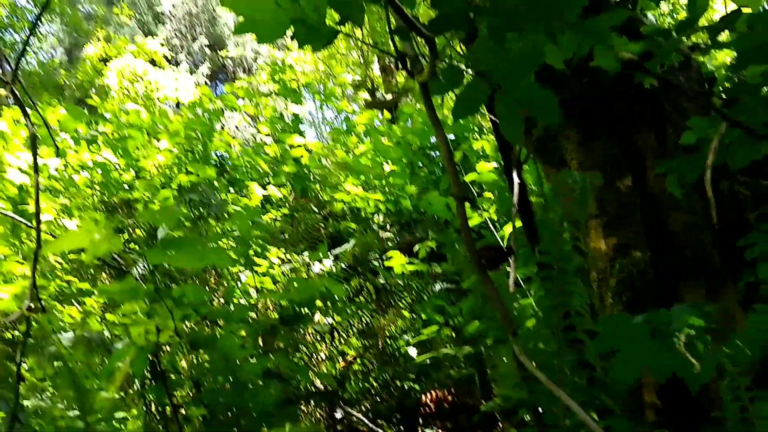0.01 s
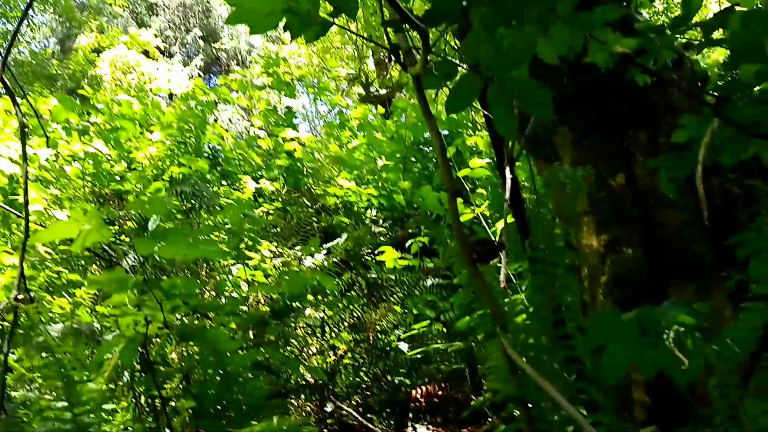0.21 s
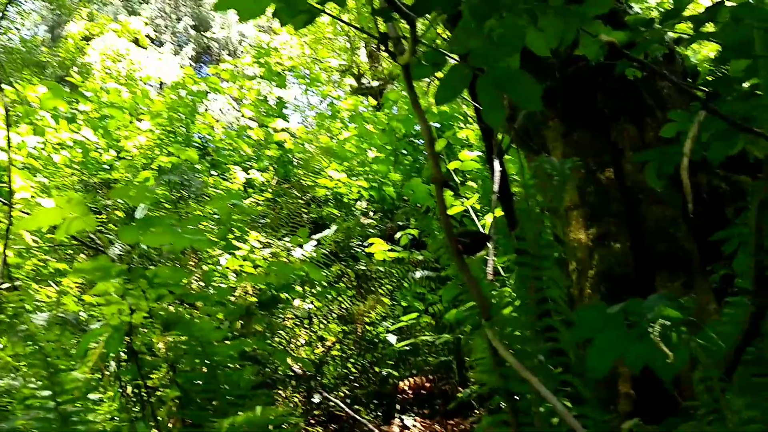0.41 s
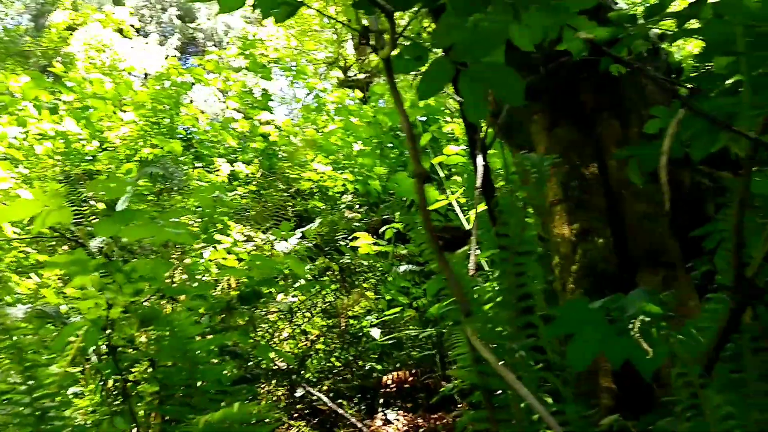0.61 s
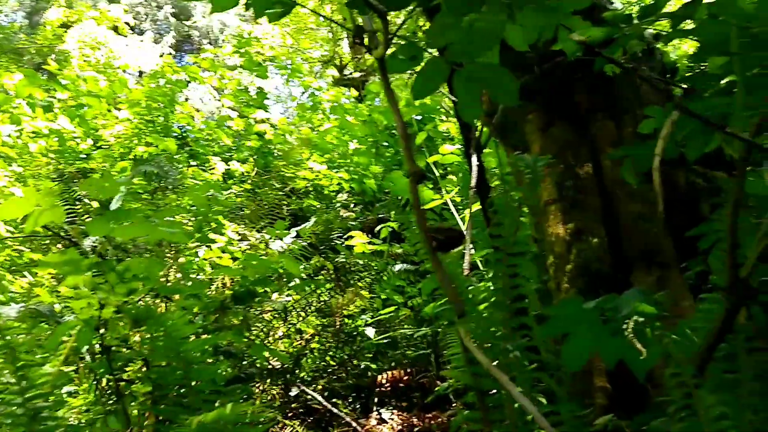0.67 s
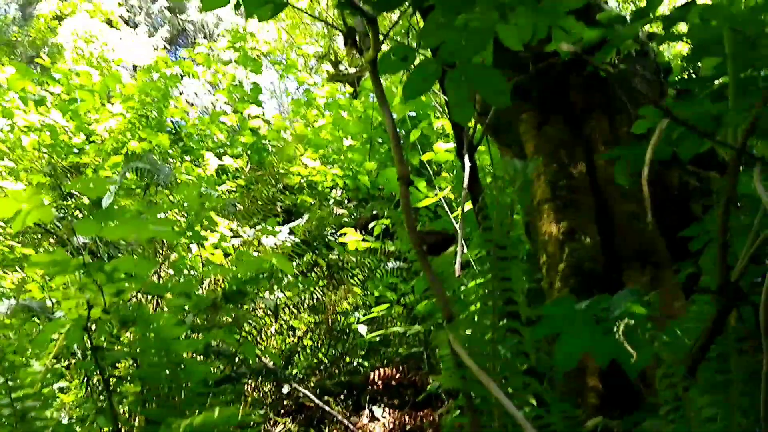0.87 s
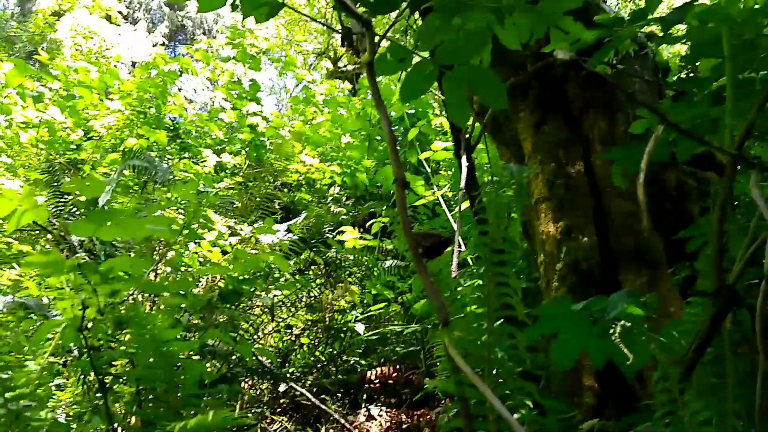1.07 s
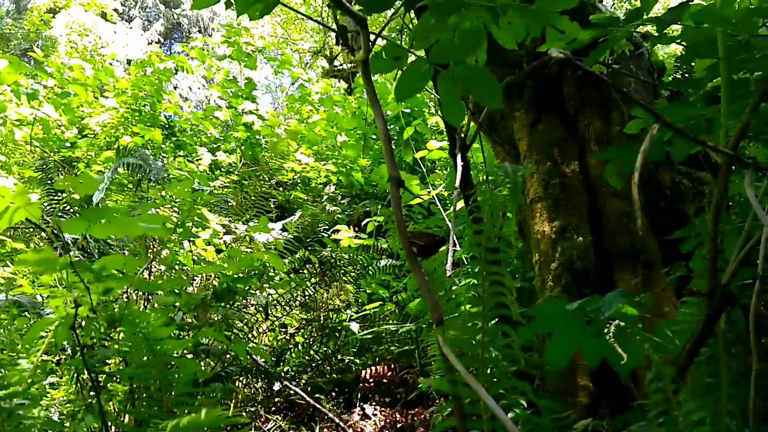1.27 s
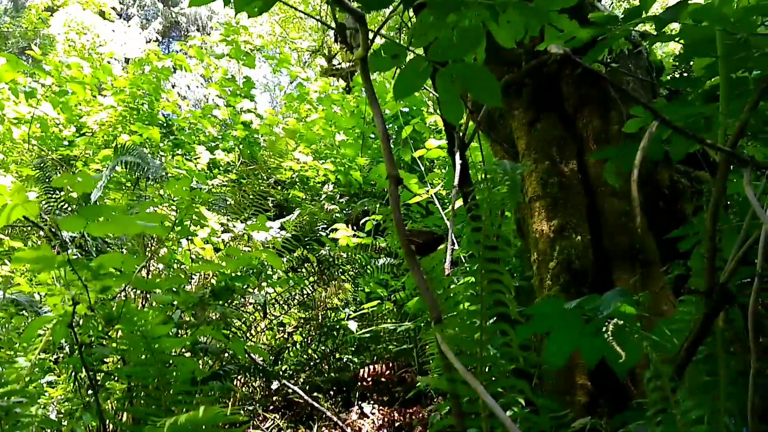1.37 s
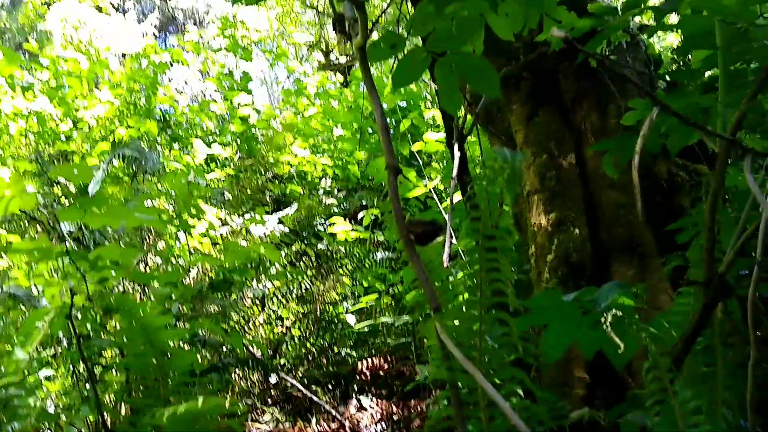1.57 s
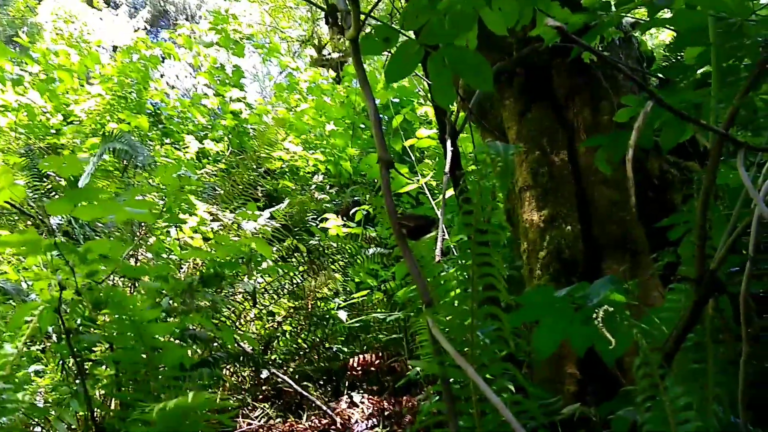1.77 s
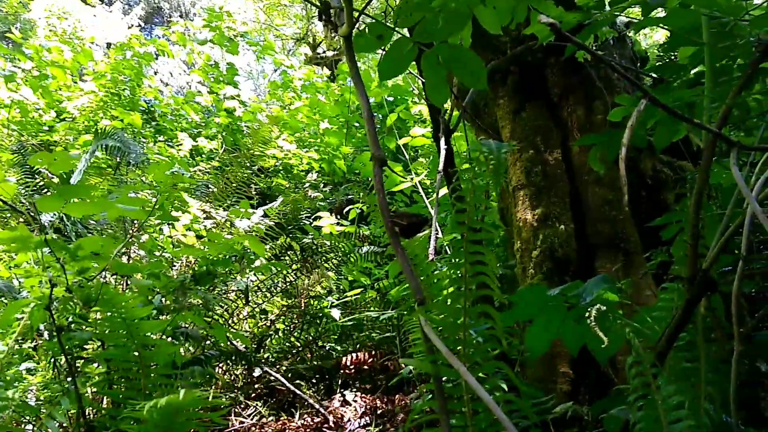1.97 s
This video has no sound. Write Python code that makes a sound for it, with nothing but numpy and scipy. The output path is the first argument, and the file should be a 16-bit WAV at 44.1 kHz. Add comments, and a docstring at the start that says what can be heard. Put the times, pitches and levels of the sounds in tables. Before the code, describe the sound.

In a leafy forest, a faint far twitter gives way to one rapid, high-pitched trill from a small bird near the microphone's left. Afterwards a soft hiss remains, with a thin distant peep and slight twig ticks.

```python
"""In a leafy forest, a small bird close by on the left rattles off a trill of sharp chips.
Each chip is a short note and a steeply falling whistle; leaves scatter it. A brief halo of broad,
bright noise is heard around each chip. A far twitter fades as the trill starts, a far bird peeps twice,
and twigs tick in bursts of noise. A broad hiss with a low flutter lies underneath, mostly at the right
microphone port (its opening)."""
import sys
import numpy as np
from scipy import signal
from scipy.fft import rfft, irfft
from scipy.io import wavfile

SR = 44100
rng = np.random.default_rng(int(sys.argv[2]) if len(sys.argv) > 2 else 0)


def to_wav(s):
    """Save 16-bit WAV."""
    ch = np.atleast_2d(s).T  # columns
    pcm = np.round(np.clip(ch, -1, 1) * 32767)  # PCM
    wavfile.write(sys.argv[1], SR, pcm.astype(np.int16))


N = 88200

# tone colour of the hiss (frequency [Hz], relative level [dB])
HISS_COLOUR = [(15, -30), (25, -20), (43, 1), (119, -3.5), (234, 3.5), (268, 0.5), (401, -9), (600, -20),
               (780, -7.5), (860, -4), (1020, -7.5), (1210, -0.5), (1540, 0.5), (2080, 3), (2870, 0),
               (3200, -4), (3650, -7), (4300, -6.5), (5300, -13), (7370, -4.5), (8900, -7.5), (9650, -30.5),
               (13300, -16.5), (15700, -67)]
# which side the hiss leans to (frequency [Hz], left minus right [dB])
HISS_BALANCE = [(40, -2.5), (140, 1), (250, -6.5), (500, -4.5), (770, -14.5), (1200, -23), (2000, -27),
                (2900, -18.5), (4200, -21.5), (6400, -33), (9000, -25), (11000, -4), (15000, -21)]
# how alike its two sides are (frequency [Hz], likeness [0 to 1])
HISS_LIKENESS = [(30, 1), (90, 0.81), (200, 0.95), (500, 0.44), (1100, 0.86), (2000, 0.057)]
# how much it flickers (frequency [Hz], typical swing [dB])
HISS_FLICKER = [(60, 2), (250, 3), (700, 4), (1300, 1.5), (2500, 1.2), (4000, 2.2), (6000, 1.5)]
# loudness of its middle band (time [s], level [dB])
HISS_LOUDNESS = [(0.0, -58.5), (0.15, -57), (0.48, -54), (0.75, -55), (1.02, -57), (1.6, -59), (2.0, -58)]
# rise and fall of the low flutter (time [s], relative level [dB])
FLUTTER_SWELL = [(0.0, -85), (0.04, -59), (0.31, -66), (0.51, -69), (0.73, -65), (1.07, -72), (1.09, -70),
                 (1.2, -64), (1.36, -79), (1.47, -66.5), (1.51, -76.5), (1.57, -69.5), (1.73, -75.5),
                 (1.75, -67.5), (1.98, -69.5), (2.0, -67)]
# rise and fall of the murmur just above it (time [s], relative level [dB])
MURMUR_SWELL = [(0.0, -85), (0.04, -63), (0.28, -79.5), (0.3, -69), (0.33, -89), (0.34, -68.5), (0.55, -66),
                (0.68, -74), (0.86, -78), (0.9, -65), (1.05, -75.5), (1.48, -68.5), (1.92, -78.5),
                (2.0, -73)]
# rise and fall of a thin, high band in the hiss (time [s], relative level [dB])
THIN_SWELL = [(0.0, -78), (0.14, -77), (0.27, -71), (0.4, -61.5), (0.49, -58.5), (0.66, -61), (0.81, -67.5),
              (1.16, -70.5), (2.0, -72)]
# far twitter, before it is set to the right (time [s], level [dB])
TWITTER_LOUDNESS = [(0.0, -56.5), (0.06, -53), (0.13, -53), (0.145, -50)]
# twig ticks (time [s], left [dB], right [dB], fade [ms], dull brushing on the right [dB])
TWIG_TICKS = [(0.035, -77, -55, 2.5, -58), (0.047, -87, -47.5, 2.7, -52.5), (1.111, -50, -52.5, 6, -87),
              (1.525, -48, -48.5, 4, -89)]
# tail of a tick, left row then right (relative level [dB], fade [ms])
TICK_LEAF_TAILS = [(-9, 70), (-.5, 55)]
# bright colour of a tick (frequency [Hz], relative level [dB])
TICK_COLOUR = [(1000, -43), (5200, -3), (6500, 13), (10000, 7.5), (15000, 3)]
# dull colour of the brushing (frequency [Hz], relative level [dB])
BRUSH_COLOUR = [(150, -22), (450, 3), (1500, 2), (4000, -7.5), (8000, -36)]
# far peeps, before they are set to the left (time [s], pitch [Hz], level [dB], fade [ms])
FAR_PEEPS = [(0.139, 9060, -48.5, 32), (0.928, 9030, -48.5, 36)]
# echoes from near leaves, left row then right (level [dB], time to fade by 60 dB [s])
LEAF_ECHOES = [(-4.5, 0.13), (3, 0.23)]
# colour of the leaf echoes (frequency [Hz], gain [dB])
LEAF_COLOUR = [(4000, 2), (6500, -3.9), (7500, 0), (8600, -1), (10800, -3), (13000, 2), (15000, -4)]
# echoes from far trees, left row then right (level [dB], time to fade by 60 dB [s])
TREE_ECHOES = [(-18.5, .5), (-12, .45)]
# colour of the tree echoes (frequency [Hz], gain [dB])
TREE_COLOUR = [(3000, 0), (6300, 0), (7500, -6), (9000, -1), (10000, -3), (13000, -1), (15000, -9)]
# the trill (time [s], whistle level [dB], whistle hold [ms], note level [dB], note's head start [ms])
TRILL_CHIPS = [(0.2181, -31, .3, -31, 4), (.2428, -23, 0.37, -32, 2.8), (0.2607, -14.5, 1.6, -38.5, 5),
               (0.2967, -14, 2.8, -22, 3.9), (.3346, -14.5, 4.3, -21.5, 5), (0.3738, -14, 3.4, -22.5, 5.5),
               (0.4153, -16, 4.1, -21, 5.4), (0.4592, -15, 5.7, -22.5, 5.2), (.5042, -13.5, 3.6, -22, 6.6),
               (0.5489, -14.5, 2.5, -21, 4.8), (0.6011, -14, 4, -20.5, 4.5), (0.6491, -14, 2.8, -21, 4.8),
               (.7013, -15.5, 5.4, -21, 4.8), (.7520, -13.5, 1.9, -23, 4.7), (0.8061, -15, 2.1, -23, 3.25)]
# colour of the halo of bright noise around each chip (frequency [Hz], relative level [dB])
HALO_COLOUR = [(2000, -38), (3600, -16.5), (4400, -12), (5300, -6), (6400, 3.5), (8500, 3.5), (12000, -2),
               (14000, -2), (15100, -17)]
# echoes off tree trunks (delay [ms], gain [dB])
TRUNK_BOUNCES = [(6.5, -15), (12.5, -20)]
# how the right port dulls the near bird (frequency [Hz], gain [dB])
RIGHT_PORT_COLOUR = [(2000, -3), (5000, -2), (6500, -1.5), (7500, -1.5), (8600, -2), (9600, -6.5),
                     (11000, -16), (13500, -8)]
# a narrow dip in what the microphone picks up (frequency [Hz], gain [dB])
MICROPHONE_DIP = [(3200, -0.5), (3700, -4), (4200, -0.5)]

TIME_S, FREQ_HZ = np.arange(N) / SR, np.arange(N // 2 + 1) * SR / N


def amp(db):
    """Turn decibels into a number to multiply by."""
    return 10 ** (np.asarray(db) / 20)


def rms_one(x):
    """Scale a signal so its average strength (root mean square) is 1."""
    return x / np.sqrt(np.mean(x ** 2) + 1e-20)


def at_hz(table, hz):
    """Read a table between its rows, giving each octave equal room."""
    row_hz, values = np.transpose(table)
    return np.interp(np.log(hz + 1), np.log(row_hz), values)


def colour(x, table):
    """Turn each frequency up or down as the table says."""
    return irfft(rfft(x) * amp(at_hz(table, FREQ_HZ)), N)


def drift(rate_hz):
    """A slow random wander of strength 1."""
    steps = int(rate_hz * N / SR * 2) + 2
    points = rng.standard_normal(200)[:steps]
    return rms_one(np.interp(np.linspace(0, steps - 1, N), np.arange(steps), points))


def waver(samples):
    """A fast random tremble of strength 1; more samples make it smoother."""
    return rms_one(np.convolve(rng.standard_normal(N), np.hanning(samples), "same"))


def bump(ms, rise_ms, fall_ms=1):
    """A bell-shaped swell that peaks at 0 ms."""
    return np.exp(-.5 * (ms / np.where(ms < 0, rise_ms, fall_ms)) ** 2)


def tone(hz):
    """A pure tone that follows a changing pitch."""
    return np.sin(2 * np.pi * np.cumsum(hz) / SR)


def late(x, ms):
    """Delay a sound."""
    lag = int(round(ms * SR / 1000))
    return np.concatenate([np.zeros(lag), x[:N - lag]])


def steady_hiss():
    """The left and right spectra of an even noise, partly alike and mostly stronger on the right."""
    shared, opposed = rfft(rng.standard_normal((2, N)))
    alike = np.clip(at_hz(HISS_LIKENESS, FREQ_HZ), 0, 1)
    lean = amp(at_hz(HISS_BALANCE, FREQ_HZ))
    shared, opposed = np.sqrt(1 + alike) * shared, np.sqrt(1 - alike) * opposed
    gain = amp(at_hz(HISS_COLOUR, FREQ_HZ)) / np.sqrt(1 + lean ** 2 + 2 * alike * lean)
    spectra = gain * np.array([lean * (shared + opposed), shared - opposed])
    middle_band = irfft(spectra.mean(0) * (FREQ_HZ > 900) * (FREQ_HZ < 2800), N)
    return spectra / middle_band.std()


def hiss():
    """A broad hiss of overlapping bands that each flicker on their own; the low ones flutter."""
    hiss_db, flutter_db, murmur_db, thin_db = [
        np.interp(TIME_S, *np.transpose(table))
        for table in (HISS_LOUDNESS, FLUTTER_SWELL, MURMUR_SWELL, THIN_SWELL)]
    spectra, out = steady_hiss(), 0
    for centre_hz in 30 * 2 ** np.arange(0, 9.6, .25):  # four bands to an octave
        band = np.clip(1 - 4 * np.abs(np.log2((FREQ_HZ + 1) / centre_hz)), 0, 1)
        level_db = hiss_db
        # three ranges rise and fall in their own way around the usual level
        if 90 < centre_hz < 450:
            level_db = flutter_db - flutter_db.mean() + hiss_db.mean()
        elif 450 <= centre_hz < 980:
            level_db = murmur_db - murmur_db.mean() + hiss_db.mean()
        elif 3800 < centre_hz < 4800:
            level_db = thin_db - np.median(thin_db) + np.median(hiss_db)
        flicker_db = at_hz(HISS_FLICKER, centre_hz) * drift(rate_hz=6.6)
        out = out + amp(level_db + flicker_db) * irfft(spectra * band, N)
    return out


def far_twitter():
    """Far twittering, blurred into a throbbing band of hiss that fades as the trill starts."""
    times, db = np.transpose(TWITTER_LOUDNESS)
    level_db = np.interp(TIME_S, np.append(times, times[-1] + .1), np.append(db, -90))
    throb_db, side_db = .83 * drift(rate_hz=24), np.array([[-3], [4]])
    band = signal.butter(3, [6840, 8265], "band", fs=SR, output="sos")
    noise = rms_one(signal.sosfilt(band, rng.standard_normal((2, N))))
    return amp(level_db + throb_db + side_db) * noise


def twig_ticks():
    """Twigs tick in bursts of bright noise, with a soft tail from the leaves and a dull brushing."""
    power, brush = 0, 0
    tail_db, tail_ms = np.transpose(TICK_LEAF_TAILS)[:, :, None]
    for time_s, left_db, right_db, fade_ms, brush_db in TWIG_TICKS:
        ms = 1000 * (TIME_S - time_s)
        after_ms = np.maximum(ms, 0)
        fade = np.exp(-after_ms / fade_ms) + amp(tail_db) * np.exp(-after_ms / tail_ms)
        shape = bump(np.minimum(ms, 0), rise_ms=5.5) * fade
        power = power + (amp([[left_db], [right_db]]) * shape) ** 2
        brush = brush + amp(brush_db) * shape[1]
    dull = brush * rms_one(colour(rng.standard_normal(N), BRUSH_COLOUR))
    bright = np.sqrt(power) * rms_one(colour(rng.standard_normal((2, N)), TICK_COLOUR))
    return bright + dull * np.array([[0], [1]])  # brushing on the right only


def far_peeps():
    """A far bird's thin, unsteady whistles start at once and linger, a little to the left."""
    wobble_hz, out = 140 * waver(samples=90), 0
    for time_s, hz, db, fade_ms in FAR_PEEPS:
        ms = 1000 * (TIME_S - time_s)
        shape = bump(np.minimum(ms, 0), rise_ms=2.5) * np.exp(-np.maximum(ms, 0) / fade_ms)
        out = out + amp(db) * shape * tone(hz + wobble_hz)
    return out * amp([[1.5], [-1.5]])


def leaf_scatter(sound, head_turns_per_s=7.4):
    """Leaves send back a spray of echoes that shifts as the bird turns; far trees add a dull tail."""
    turn, sides = np.pi * head_turns_per_s * TIME_S, []
    for channel, leaves, trees in zip(sound, LEAF_ECHOES, TREE_ECHOES):
        # dividing keeps a longer echo from carrying more energy
        leaf_fade, tree_fade = [amp(db - 60 * TIME_S[:SR] / fade_s) / np.sqrt(fade_s * SR / np.log(1e6))
                                for db, fade_s in (leaves, trees)]
        tail = tree_fade * rng.standard_normal(SR)
        echoes = colour(signal.fftconvolve(channel, tail)[:N], TREE_COLOUR)
        for k in range(3):  # three sprays take turns
            share = np.sqrt(8 / 9) * np.cos((turn + k * np.pi) / 3) ** 2
            spray = (leaf_fade * rng.standard_normal(SR))[:SR // 4]
            echoes += colour(signal.fftconvolve(channel * share, spray)[:N], LEAF_COLOUR)
        sides.append(echoes)
    return np.array(sides)


def near_trill(whistle_hz=10900, fall_hz_per_ms=860, note_hz=7450, halo_db=-8.5):
    """Each chip is a short arched note, then a falling whistle. A brief halo of noise surrounds it."""
    tones, halo_shape, half = np.zeros(N), np.zeros(N), 1200
    ms = np.arange(-half, half) * 1000 / SR
    wobble_hz = 220 * waver(samples=30)
    note_tops_hz = note_hz + 170 * rng.standard_normal(len(TRILL_CHIPS))
    for (time_s, whistle_db, hold_ms, note_db, ahead_ms), top_hz in zip(TRILL_CHIPS, note_tops_hz):
        span = slice(int(time_s * SR) - half, int(time_s * SR) + half)
        note_ms = ms + ahead_ms
        arch_hz = np.maximum(top_hz + wobble_hz[span] / 2 - 80 * note_ms ** 2, 3000)
        note = tone(arch_hz) + amp(-22) * tone(2 * arch_hz)  # with a faint octave above
        tones[span] += amp(note_db) * bump(note_ms, rise_ms=2.4, fall_ms=2.4) * note
        falling_hz = np.clip(whistle_hz - fall_hz_per_ms * ms + wobble_hz[span], 3000, 16000)
        held = bump(ms - np.clip(ms, 0, hold_ms), rise_ms=1.1, fall_ms=1)
        sag_db = -1.7 * np.maximum(ms, 0)
        tones[span] += amp(whistle_db + sag_db) * held * tone(falling_hz)
        chip_db = (whistle_db + note_db) / 2
        halo_shape[span] += amp(chip_db + halo_db) * bump(ms + .4, rise_ms=10.1, fall_ms=9.2)
    roughness = 1 + .33 * waver(samples=40)
    halo = halo_shape * rms_one(colour(rng.standard_normal((2, N)), HALO_COLOUR))
    return from_the_left(tones * roughness, halo)


def from_the_left(tones, halo):
    """A sound from the left reaches the right port later and duller; trunks echo it on the left."""
    left = tones + halo[0] + sum(amp(db) * late(tones, ms) for ms, db in TRUNK_BOUNCES)
    right = late(tones + amp(-.5) * halo[1], ms=.9)
    return np.array([left, colour(right, RIGHT_PORT_COLOUR)])


def scene():
    """Both birds and their echoes, over the ticks, the twitter and the hiss."""
    trill, peeps = near_trill(), far_peeps()
    echoes = leaf_scatter(trill + amp(5) * peeps)  # the far bird gets more echo
    return trill + peeps + echoes + twig_ticks() + far_twitter() + hiss()


def record(dry, cutoff_hz=15900):
    """The microphone has a narrow dip, and the highest treble is cut off."""
    treble_cut = signal.cheby2(30, 75, cutoff_hz, fs=SR, output="sos")
    return signal.sosfilt(treble_cut, colour(dry, MICROPHONE_DIP))


dry = scene()
out = record(dry)
to_wav(out)
```